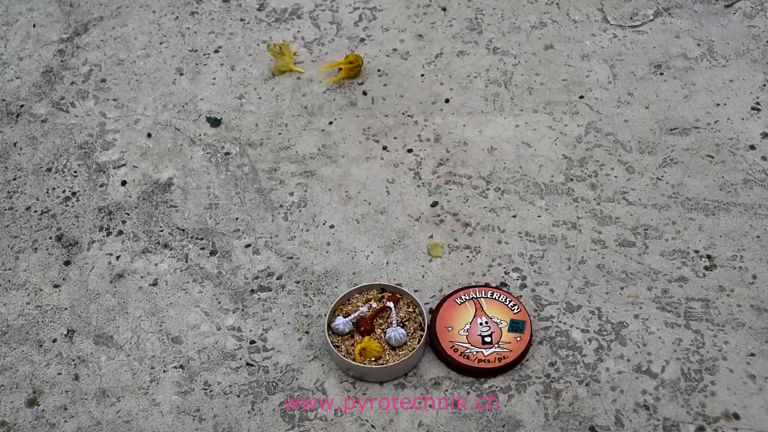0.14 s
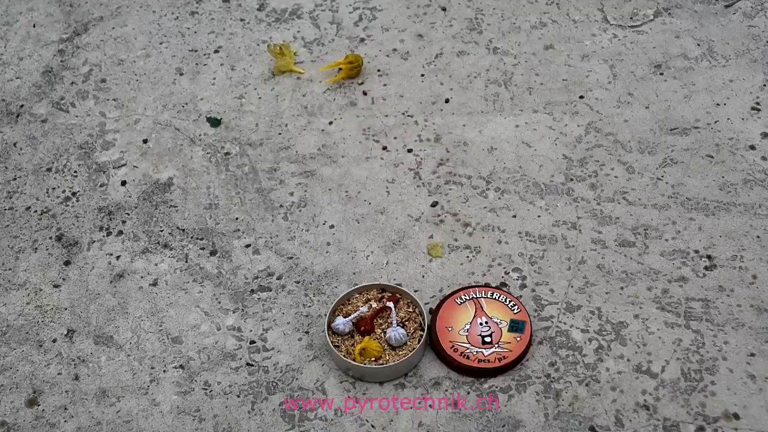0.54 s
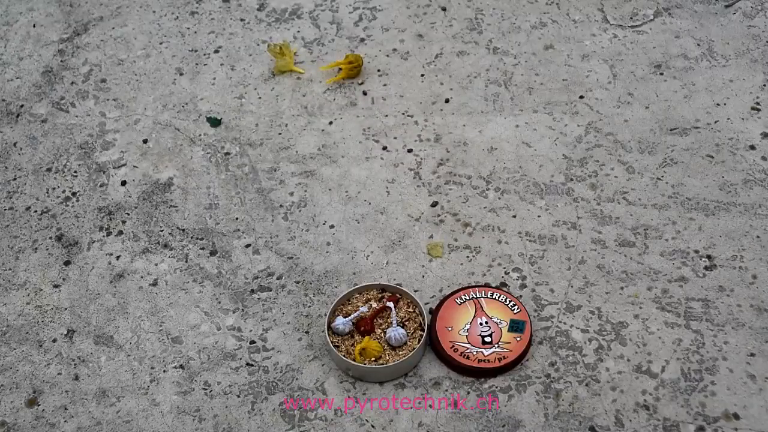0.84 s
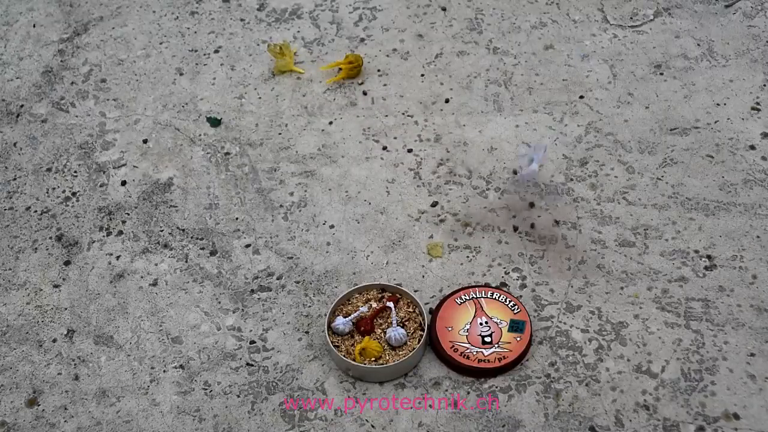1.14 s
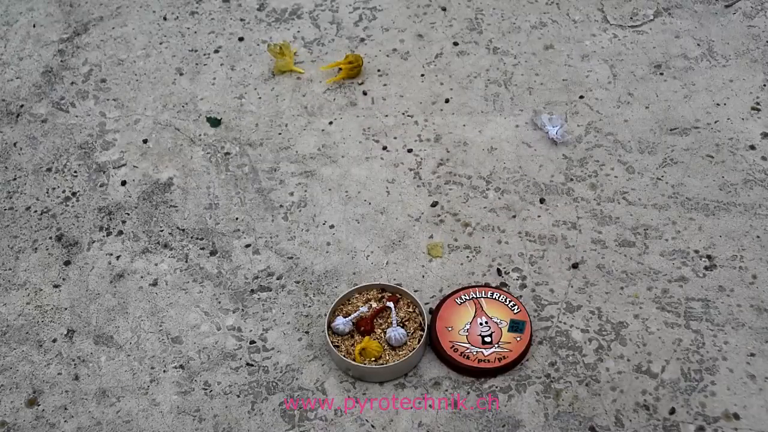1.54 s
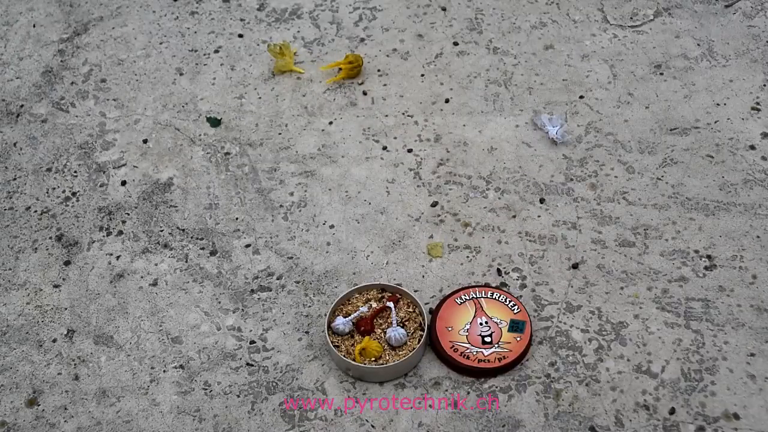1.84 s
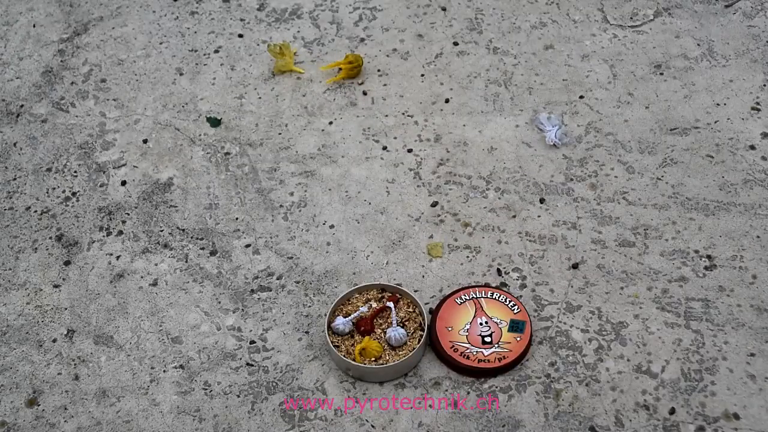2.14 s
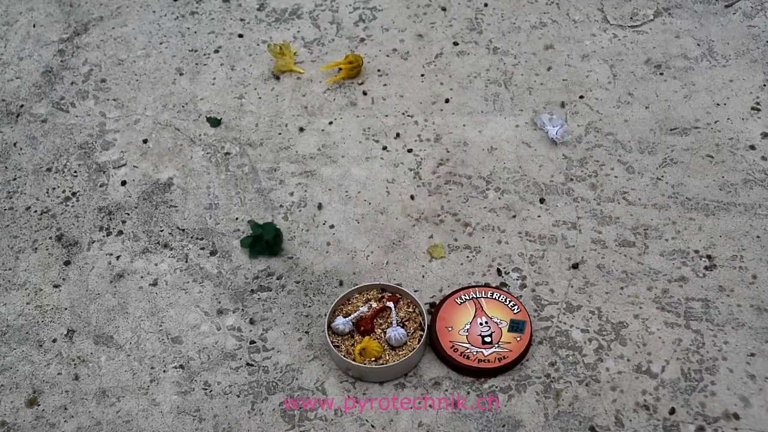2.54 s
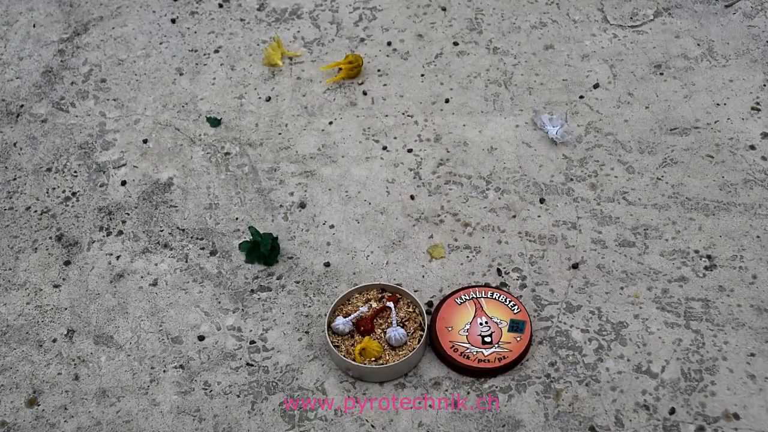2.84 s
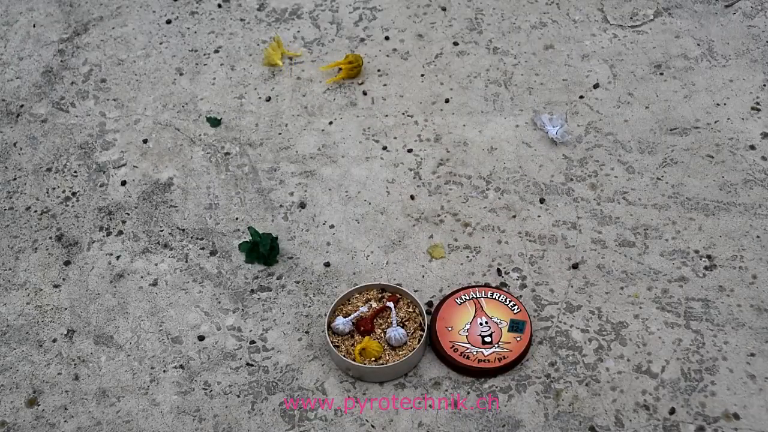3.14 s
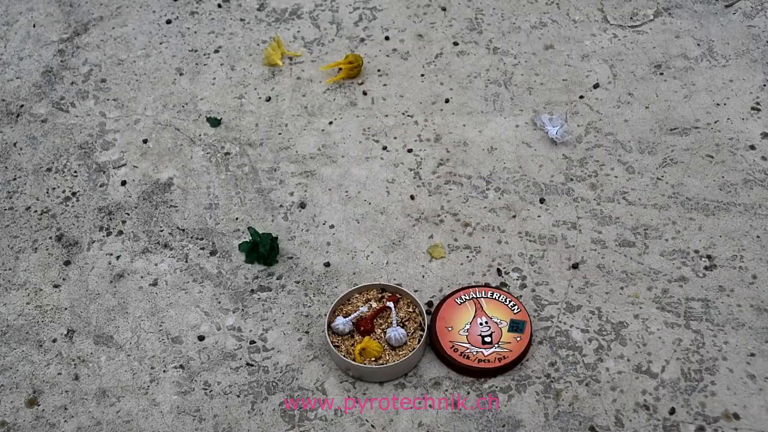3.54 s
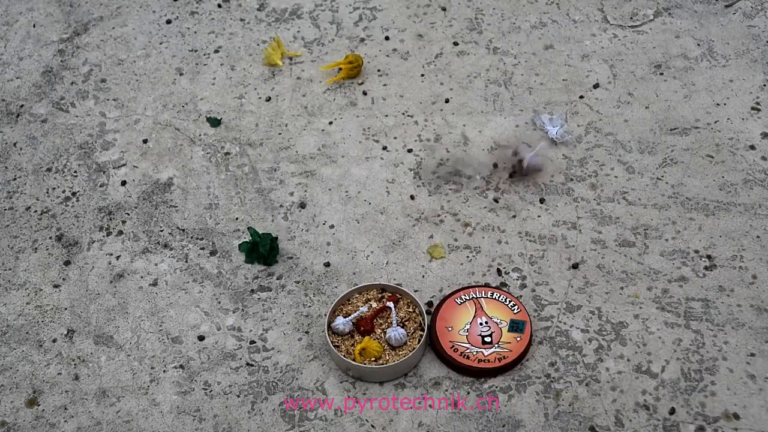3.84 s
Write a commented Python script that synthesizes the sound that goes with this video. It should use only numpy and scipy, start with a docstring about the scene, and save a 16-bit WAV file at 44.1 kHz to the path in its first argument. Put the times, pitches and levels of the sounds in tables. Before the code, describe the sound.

Close, overloaded microphone outdoors: faint tail of an earlier burst and light ticks, then three widely spaced dry pellet bangs on hard ground, each followed by brief hissy reflections and scattering grit over low traffic rumble.

```python
"""Three snap pellets bursting

Three pellets burst on concrete close to a microphone input that overloads: a ringing shock, a push of air,
a noisy crack and a low thump, then a short hiss of band-wise decaying noise sent back by nearby walls.
Flung grit pings off metal (decaying modes) and ticks on the ground (band noise and clustered rings).
Behind lie distant traffic and hiss: shaped noise with a wandering low rumble, plus stereo hiss."""
import sys
import numpy as np
from scipy import signal
from scipy.fft import rfft, irfft
from scipy.io import wavfile
from scipy.ndimage import uniform_filter1d

SR = 44100
rng = np.random.default_rng(int(sys.argv[2]) if len(sys.argv) > 2 else 0)


def transcribe(signal):
    """Save signal, clipped to [-1, 1], as a 16-bit WAV file at the path in sys.argv[1]."""
    frames = np.atleast_2d(signal).T
    limited = np.clip(frames, -1, 1)
    pcm = np.round(limited * 32767).astype(np.int16)
    wavfile.write(sys.argv[1], SR, pcm)


N = 176400

# noise spectrum of bursts and metal ticks: hz, density_db (per Hz, relative)
CRACK_SPECTRUM = [(500, -17), (1500, -8.5), (2500, -8.5), (3400, 1.5), (4500, -5.5), (8000, -16),
                  (15000, -24)]


def undb(db):
    """Decibels to amplitude."""
    return 10 ** (np.asarray(db) / 20)


def curve(table, x_hz):
    """Interpolate a table over log frequency."""
    points = np.array(table, float)
    return np.interp(np.log(np.maximum(x_hz, 1)), np.log(points[:, 0]), points[:, 1])


def noise(table, n):
    """Noise of rms 1 with the given spectrum."""
    bins_hz = np.arange(n // 2 + 1) * SR / n
    y = irfft(rfft(rng.standard_normal(n)) * undb(curve(table, bins_hz)), n)
    return y / y.std()


def band(x, lo_hz, hi_hz):
    """Butterworth band-pass."""
    sos = signal.butter(2, [lo_hz, min(hi_hz, SR * .45)], "band", fs=SR, output="sos")
    return signal.sosfilt(sos, x)


def walk(rate_hz, n):
    """Slow random wander, spread 1."""
    hold = int(SR / rate_hz)
    steps = np.repeat(rng.standard_normal(n // hold + 1), hold)
    y = uniform_filter1d(steps, hold)[:n]
    return y / y.std()


def fade(t, t60_s):
    """Exponential decay, 60 dB in t60_s."""
    return np.exp(-np.log(1000) * t / max(t60_s, 1e-3))


def add(out, y, start_s):
    """Mix y into out at start_s, trimmed to the scene."""
    k = int(round(start_s * SR))
    y = y[max(-k, 0):N - k]
    out[max(k, 0):max(k, 0) + len(y)] += y


def bangs():
    """Each burst: ringing shock front, half-sine air push, noisy crack, low thump and wall echo."""
    # burst times: start_s
    burst_times = (1.18325, 2.45378, 3.89903)
    # per burst: push_db, push_s, shock_db, crack_db, echo_db
    burst_levels = [(13.5, .0014, 16, 5, -14), (14.5, 0.0018, 16.5, 2.5, -15.5),
                    (16, 0.001592, 15, 7, -14.5)]
    push_late_s = .00025
    # the shock front rings the microphone port, again inverted about as the push ends
    shock_hz, shock_t60_s, rebound_db, rebound_t60_s = 3086, 0.0019, -4.5, 0.0033
    crack_rise_s, crack_t60_s = 0.00067, .02
    thump_hz, thump_t60_s, thump_db = 70, .1, -24
    earlier_s, earlier_db = -.2, -17.5  # a pellet that burst just before; only its echo is left

    out, t = np.zeros(N), np.arange(SR // 4) / SR
    ring = np.sin(2 * np.pi * shock_hz * t)
    for start_s, (push_db, push_s, shock_db, crack_db, echo_db) in zip(burst_times, burst_levels):
        shock = undb(shock_db) * ring * fade(t, shock_t60_s)
        rebound = -undb(shock_db + rebound_db) * ring * fade(t, rebound_t60_s)
        push = undb(push_db) * np.sin(np.pi * np.minimum(t / push_s, 1))
        crack = undb(crack_db) * noise(CRACK_SPECTRUM, len(t)) * fade(t, crack_t60_s)
        crack *= np.minimum(t / crack_rise_s, 1)
        thump = undb(thump_db) * np.sin(2 * np.pi * thump_hz * t) * fade(t, thump_t60_s)
        add(out, shock + crack + thump, start_s)
        add(out, push, start_s + push_late_s)
        add(out, rebound, start_s + push_s + push_late_s / 2)
        add(out, undb(echo_db) * echo(), start_s)
    add(out, undb(earlier_db) * echo(), earlier_s)
    return out


def echo():
    """Reflections of one burst: each narrow band dies at its own rate, unevenly."""
    # reflected noise spectrum: hz, density_db (per Hz, relative)
    echo_spectrum = [(150, -22), (300, -16), (550, -18.5), (800, -17), (1100, -12), (1500, -11.5),
                     (2400, -11.5), (3500, -3.5), (4500, -9.5), (6500, -14.5), (10000, -26.5), (15500, -43)]
    # decay of the reflections: hz, t60_s
    echo_decay = [(150, 0.3), (400, 0.12), (1000, .24), (2000, .22), (3500, .25), (6000, .21),
                  (10000, 0.18), (15000, 0.17)]
    rise_s, patchy_db = 0.022, 1.5
    late_db, late_stretch = -27, 3.2  # weaker, longer second decay

    t, out = np.arange(SR) / SR, 0
    x = noise(echo_spectrum, SR)
    lumps = undb(patchy_db * walk(90, SR))
    half_band = 2 ** (1 / 12)
    for hz in 140 * 2 ** np.arange(0, 6.8, 1 / 6):
        t60_s = curve(echo_decay, hz)
        decay = fade(t, t60_s) + undb(late_db) * fade(t, late_stretch * t60_s)
        out = out + band(x, hz / half_band, hz * half_band) * decay * lumps
    return out * np.minimum(t / rise_s, 1)


def grit():
    """Flung grit: pings on metal and ticks on the concrete."""
    out = np.zeros(N)
    metal_pings(out)
    ground_ticks(out)
    return out


def metal_pings(out):
    """Grit excites the decaying modes of two metal things, with a contact tick and a bounce tick."""
    # hits, first metal then second: start_s, ring_db, tick_db, bounce_after_s, bounce_db (re tick)
    pings = [(0.1248, -48, -44, 0.014, -3.5), (3.1074, -52.5, -43.5, 0.014, -10)]
    # modes of the first metal thing: hz, level_db, t60_s (before decay_scale)
    first_metal = [(904, -17.5, 1), (1594, -6.5, 0.49), (1980, -12.5, 0.44), (1870, -9, 0.091),
                   (2335, -11, 0.46), (2870, -12, 0.28), (3252, -18, 0.23), (3490, -6.5, 0.35),
                   (3590, -11, 0.32), (3910, -1, 0.19), (5000, -17, 0.31), (5900, -4, 0.074)]
    # modes of the second metal thing: hz, level_db, t60_s (before decay_scale)
    second_metal = [(1380, -14, 0.52), (1674, -9.5, 0.4), (1970, -11, 0.52), (2200, -10, 0.28),
                    (3500, -19, 0.98), (3591, 7, 0.07), (4260, 0.5, 0.083), (5280, -4, 0.14),
                    (5577, -3, 0.099), (7300, -11, 0.18), (7660, -2, 0.083), (7800, -15, 0.11)]
    decay_scale = 0.96
    waver_rad, waver_hz = 0.54, 60.3  # phase wander that roughens the rings

    t = np.arange(SR // 2) / SR
    for (start_s, ring_db, tick_db, after_s, bounce_db), modes in zip(pings, (first_metal, second_metal)):
        ring = np.zeros(len(t))
        for hz, db, t60_s in modes:
            phase = 2 * np.pi * (hz * t + rng.random()) + waver_rad * walk(waver_hz, len(t))
            ring += undb(db) * np.sin(phase) * fade(t, decay_scale * t60_s)
        add(out, undb(ring_db) * ring, start_s)
        for at_s, db in ((start_s, tick_db), (start_s + after_s, tick_db + bounce_db)):
            tick = noise(CRACK_SPECTRUM, len(t)) * (fade(t, 0.015) + 0.12 * fade(t, 0.31))
            tick += 0.5 * rattle(t, 4500, 15000, 0.066)
            add(out, undb(db) * tick, at_s)


def ground_ticks(out):
    """Grit on concrete: decaying band noise plus a broad treble rattle."""
    # ticks: start_s, level_db (initial rms), pitch_hz, width_hz, t60_s, treble_db
    ticks = [(0.345, -68.5, 3700, 300, 0.17, -75), (0.446, -55, 4500, 3020, 0.017, -71),
             (0.544, -65, 3520, 1500, 0.04, -80), (0.565, -52.5, 1600, 2000, 0.011, -77),
             (0.601, -63, 4000, 2040, 0.043, -62), (0.7454, -43.5, 5900, 2020, 0.016, -67),
             (.7495, -64, 7400, 4000, 0.011, -45), (0.831, -76, 6050, 2000, 0.016, -66),
             (0.962, -67.5, 3500, 1500, 0.028, -65), (1.4298, -55, 4000, 2420, 0.032, -65),
             (1.447, -63, 5900, 3000, 0.017, -66), (1.7607, -61, 5100, 497, 0.13, -61),
             (1.974, -69, 3490, 1500, 0.095, -77), (2.0145, -58.5, 3500, 2500, 0.048, -56),
             (2.018, -60.5, 1080, 200, 0.21, -60), (2.024, -62, 5070, 2000, .05, -65),
             (2.033, -57, 3250, 250, 0.095, -68), (2.107, -67.5, 4000, 2500, 0.17, -63),
             (2.559, -55, 9200, 4000, .02, -52), (2.70, -62.5, 3400, 808, .04, -77),
             (2.715, -61, 13500, 4000, 0.0086, -73.5), (3.245, -65.5, 3200, 2500, 0.036, -74),
             (2.80, -70, 7500, 3000, 0.016, -61)]
    t = np.arange(SR // 2) / SR
    for start_s, db, hz, width_hz, t60_s, treble_db in ticks:
        narrow = band(rng.standard_normal(len(t)), hz - width_hz / 2, hz + width_hz / 2)
        narrow = undb(db) * narrow / narrow.std() * fade(t, t60_s)
        treble = undb(treble_db) * rattle(t, 2000, 13500, t60_s)
        add(out, narrow + treble, start_s)


def rattle(t, lo_hz, hi_hz, t60_s):
    """Short rings at random pitches over a little noise."""
    modes, ring_share, noise_share = 22, 0.41, 0.68
    draws = rng.random((modes, 4, 1))
    hz = lo_hz + (hi_hz - lo_hz) * draws[:, 0] ** 2
    level = 0.55 + draws[:, 2]
    speed = (0.38 + draws[:, 3]) * (1 + hz / 8000)  # higher rings tend to die sooner
    rings = np.sin(2 * np.pi * (hz * t + draws[:, 1])) * level * fade(t * speed, t60_s)
    hiss = band(rng.standard_normal(len(t)), lo_hz, hi_hz) * fade(t, .5 * t60_s)
    return ring_share * rings.sum(axis=0) / 2 + noise_share * hiss


def background():
    """Distant traffic and hiss: shaped noise whose low rumble and deep gusts swell and sink."""
    # traffic and hiss spectrum: hz, density_db (per Hz, relative)
    floor_spectrum = [(12, -46.5), (20, -19), (42, -19.5), (53, -1), (74, -1.5), (145, -5.5), (176, -8),
                      (408, -15.5), (510, -18.5), (1050, -14), (2120, -27), (3500, -26), (15800, -34)]
    # low rumble swell: time_s, gain_db
    rumble_swell = [(0, -7), (.3, 5.5), (0.601, -3.5), (1.099, 0), (1.6, -10), (1.75, 1), (2.0, 4.5),
                    (2.101, 4.5), (2.9, 3), (3.051, -9), (3.4, -4), (3.801, 2.5), (4, -3)]
    # deepest rumble swell: time_s, gain_db (re deep_db)
    deep_swell = [(0, -5.5), (1.6, -6.5), (1.75, 4), (1.95, -1), (2.049, 6), (2.901, 6.5), (3.05, -8),
                  (4, -5)]
    floor_db, rumble_hz = -65.5, 90
    flicker_db, hiss_wander_db = -1, .4
    deep_lo_hz, deep_hi_hz, deep_db, gust_db = 16, 44.2, -77, 3

    t = np.arange(N) / SR
    floor = noise(floor_spectrum, N) * undb(floor_db)
    low = signal.sosfiltfilt(signal.butter(2, rumble_hz, fs=SR, output="sos"), floor)
    deep = band(rng.standard_normal(N), deep_lo_hz, deep_hi_hz)
    gust = np.interp(t, *np.array(deep_swell).T) + gust_db * walk(21, N)
    swell = np.interp(t, *np.array(rumble_swell).T) + flicker_db * walk(8, N)
    deep_rumble = deep / deep.std() * undb(deep_db + gust)
    hiss = (floor - low) * undb(hiss_wander_db * walk(1, N))
    return deep_rumble + low * undb(swell) + hiss


def side_hiss():
    """Noise of opposite sign left and right."""
    # side spectrum: hz, density_db (per Hz, relative)
    side_spectrum = [(24, -34), (40, -7.5), (81, 1.5), (344, -4), (420, -4.5), (627, -6.5), (3520, -5.5),
                     (15800, -10)]
    return undb(-80) * noise(side_spectrum, N)


def bass_cut(x):
    """Second-order high-pass of the microphone; turns the push of air into a swing."""
    cut_hz, cut_q = 64, 0.77
    w = 2 * np.pi * cut_hz
    b, a = signal.bilinear([1, 0, 0], [1, w / cut_q, w ** 2], SR)
    return signal.lfilter(b, a, x)


def scene():
    """Bursts through the bass cut, then grit, background and stereo hiss."""
    mid = bass_cut(bangs()) + grit() + background()
    side = side_hiss()
    return np.array([mid + side, mid - side])


def record(dry):
    """Soft overload with slightly different ceilings left and right, then a steep treble cut."""
    ceiling, uneven, knee, top_hz = 1.02, .015, 2.5, 16000
    limit = ceiling * np.array([[1 + uneven], [1 - uneven]])
    x = dry / (1 + np.abs(dry / limit) ** knee) ** (1 / knee)
    return signal.sosfilt(signal.ellip(8, .2, 50, top_hz, fs=SR, output="sos"), x)


dry = scene()
out = record(dry)
transcribe(out)
```